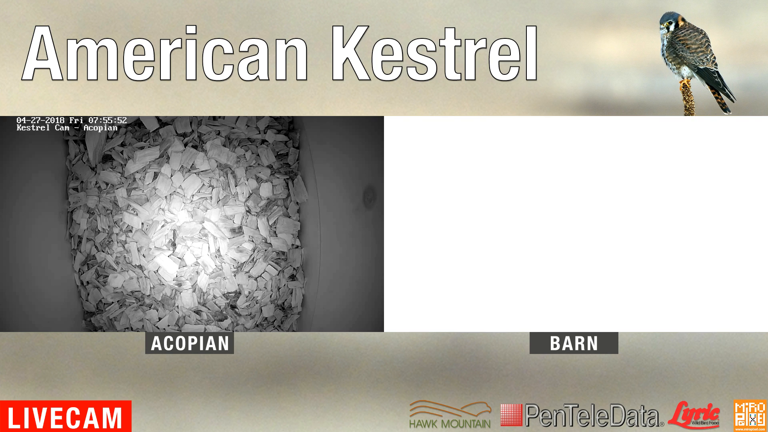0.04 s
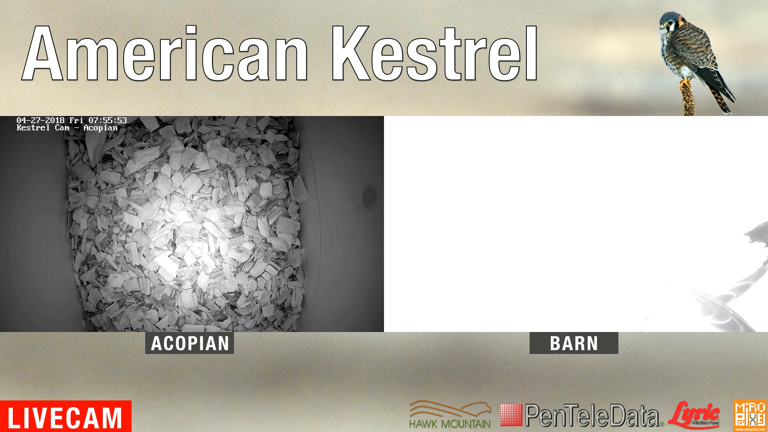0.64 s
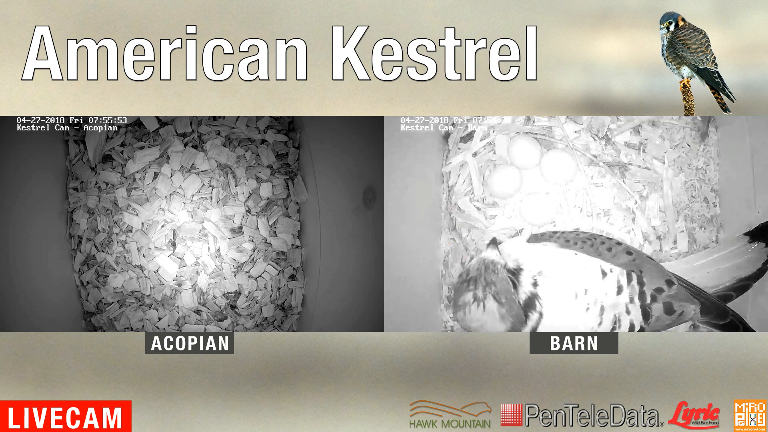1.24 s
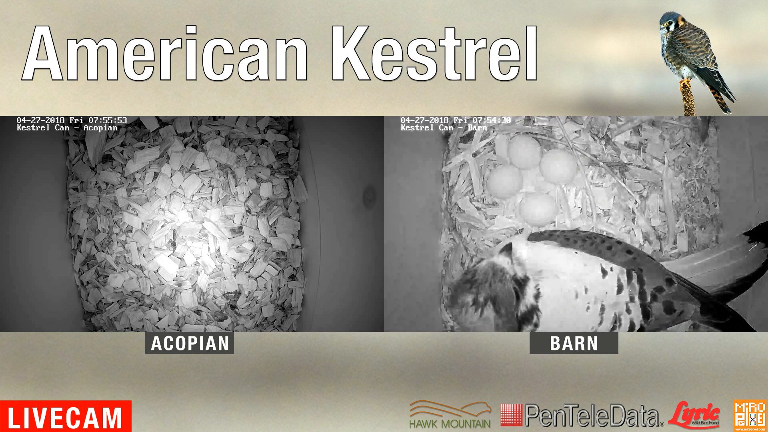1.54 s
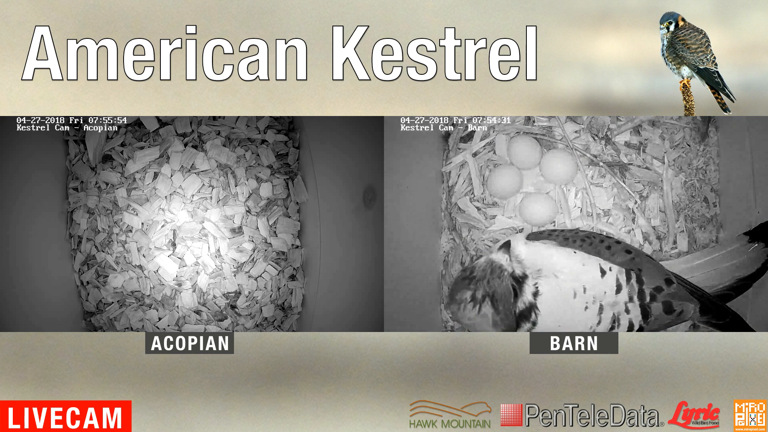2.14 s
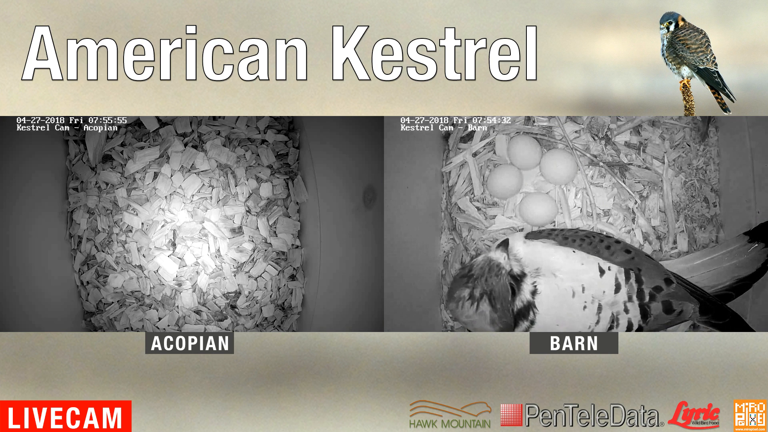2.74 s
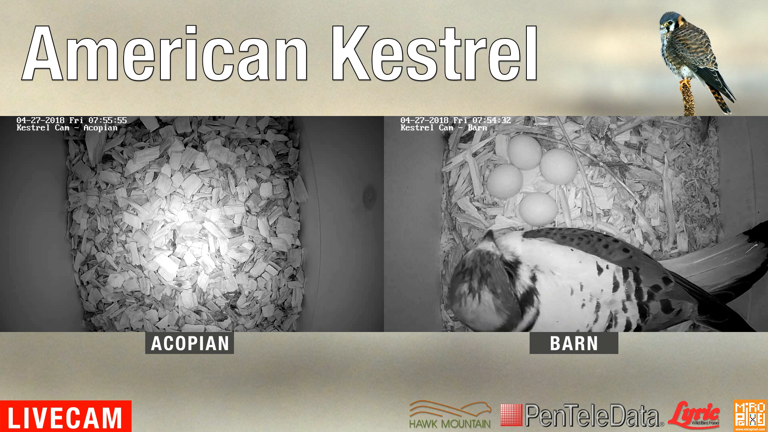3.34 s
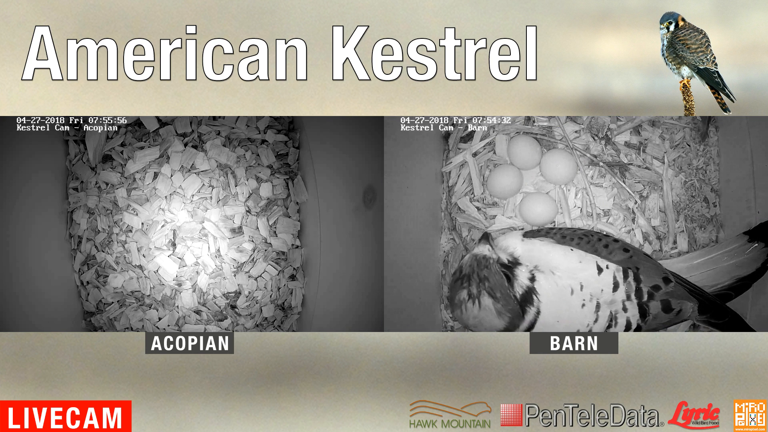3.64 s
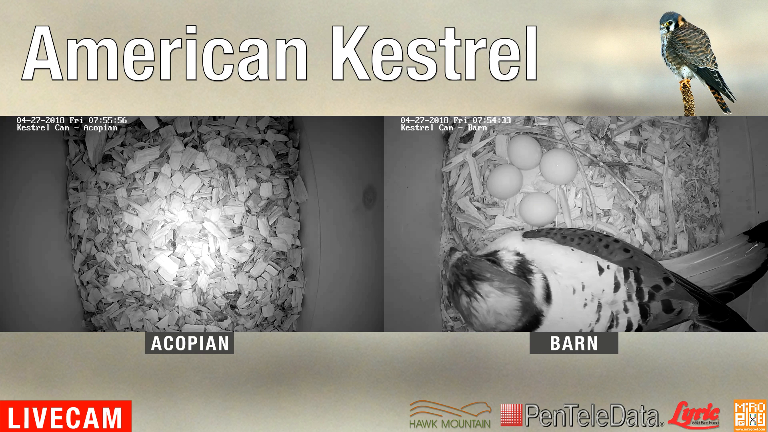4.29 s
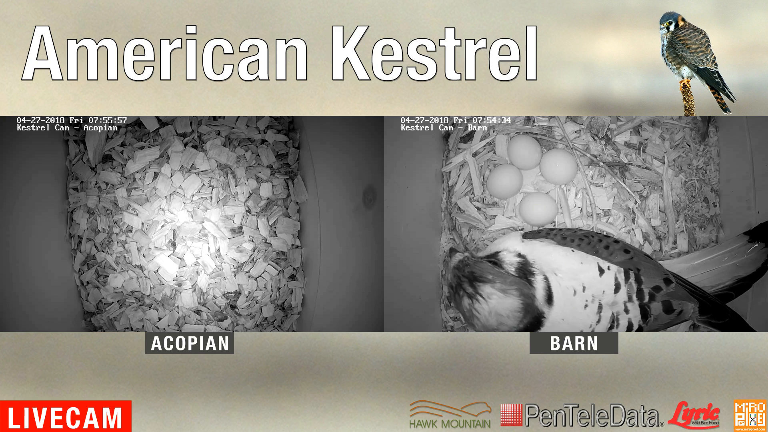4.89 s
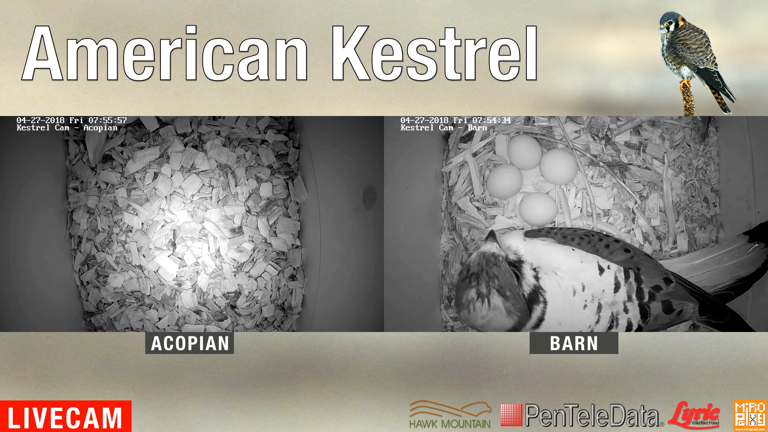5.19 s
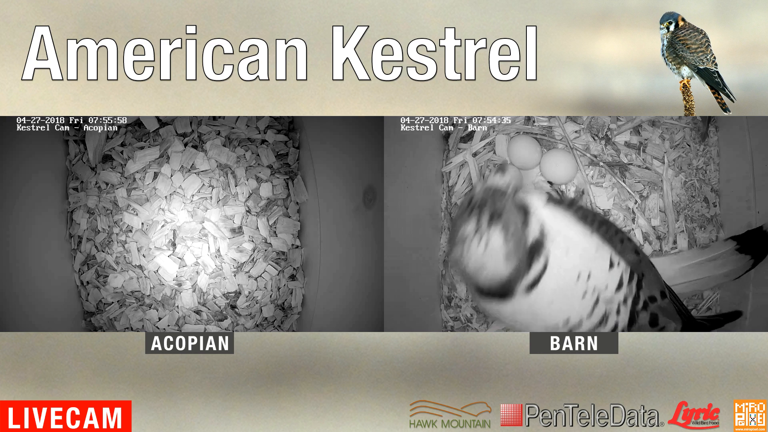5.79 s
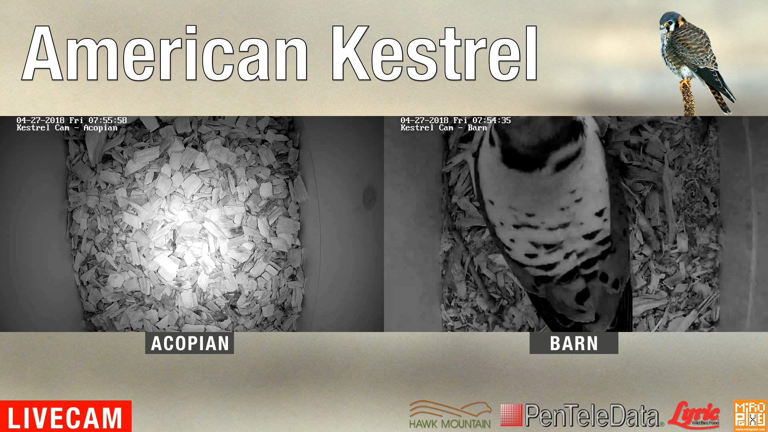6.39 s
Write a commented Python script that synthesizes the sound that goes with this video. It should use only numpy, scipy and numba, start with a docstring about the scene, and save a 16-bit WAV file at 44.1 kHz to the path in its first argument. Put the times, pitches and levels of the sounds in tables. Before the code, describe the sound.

A small falcon shuffles about on wood shavings inside a wooden nest box. Its body crunches the bedding while its feet scrape and knock and dry chips snap and creak. Two faint, thin high squeaks come midway, followed by one sharper knock, then hoarse falling swishes crowd in among the crackles. The microphone is very close and hisses steadily, and the box adds a short hollow ring.

```python
"""A small falcon shuffles about in a wooden nest box, close to the microphone of a nest camera.
From the start its body crunches the shavings, its feet scrape and knock, and dry chips snap and creak.
Two thin high squeaks come near 3.2 and 4 s, the hardest knock at 4.4 s; then hoarse falling swishes
crowd in. Throughout, the box adds a short hollow ring, the microphone hisses, and the camera's low
sample rate mirrors a faint fizz into the treble."""
import sys
import numpy as np
from scipy import signal
from scipy.fft import rfft, irfft, next_fast_len
from scipy.io import wavfile
from scipy.ndimage import uniform_filter1d, minimum_filter1d
from numba import njit

SR = 44100
rng = np.random.default_rng(int(sys.argv[2]) if len(sys.argv) > 2 else 0)


def log_audio(samples):
    """Write samples as a 16-bit WAV file to the path given in sys.argv[1]."""
    # one column per channel
    frames = np.atleast_2d(samples).T
    # limit to full scale, then quantise
    limited = np.clip(frames, -1, 1)
    pcm = np.round(limited * 32767).astype(np.int16)
    wavfile.write(sys.argv[1], SR, pcm)


N = 283122
T = np.arange(N) / SR

# Levels in all tables are relative: each layer has its own gain.
# blows of feet and bill: t/s, level/dB, f/Hz, ring swell/cycles, loose chips against the blow/dB
KNOCK_HITS = [(0.148, -19, 1360, 3, -5), (0.164, -24, 477, 1.8, -28), (0.247, -19, 1640, 5.5, -12),
              (0.276, -17.5, 2530, 4.3, -24), (0.304, -23, 1640, 2.2, -9), (0.322, -15.5, 950, 1.6, -26),
              (0.362, -16.5, 560, 1.5, -8.5), (0.406, -20.5, 377, 2.7, -19.5), (0.492, -19, 1390, 3.7, -22),
              (0.603, -21, 870, 3.7, -21), (0.615, -13, 1290, 1.4, -13), (0.665, -17, 1660, 3.5, -10),
              (0.683, -22.5, 2950, 3.5, -5), (0.7045, -11, 690, 0.76, -14), (0.717, -22, 2850, 4.6, -4),
              (0.793, -21.5, 820, 1.7, -19), (0.841, -25.5, 1080, 1.9, -0.5), (0.9225, -12, 2030, 3.6, -11),
              (0.932, -19, 2330, 3.1, -14), (1.001, -24, 2020, 3, -21), (1.067, -27, 660, 2.1, -20),
              (1.113, -24, 470, 1.5, -11), (1.238, -17.5, 1127, 4.3, -22), (1.249, -18.5, 1127, 4.6, -25),
              (1.261, -17, 424, 1.16, -17), (1.376, -20, 945, 2.8, -27), (1.466, -19, 1165, 2.1, -2.5),
              (1.524, -6.5, 1980, 3.1, -29), (1.5303, -7.5, 1095, 1.3, -15), (1.531, -17, 2460, 4.8, -19),
              (1.544, -10, 1510, 2.1, -23), (1.621, -20, 800, 2, -23), (1.716, -18.5, 1010, 4.7, -10),
              (1.741, -19, 860, 1.4, -9), (1.778, -17.5, 1660, 4.3, -15), (1.827, -23, 423, 1.3, -10),
              (1.881, -15, 1125, 1.8, -15), (2.092, -23, 1610, 3, -22), (2.108, -14, 1220, 4, -15),
              (2.299, -19, 1296, 2.8, -3.5), (2.554, -12.5, 1880, 0.98, -2), (2.593, -15.5, 2650, 2.2, -14),
              (2.667, -20.5, 2290, 3.7, -13), (2.736, -17, 1830, 3, -15), (2.823, -19, 2540, 4.4, -16),
              (2.829, -11.5, 2010, 2.6, -9), (2.833, -20, 350, 0.59, -19), (2.891, -23, 2410, 2.9, -8),
              (2.955, -19.5, 630, 1.5, -17.5), (2.968, -20.5, 1700, 4.8, -18),
              (3.003, -22.5, 580, 1.2, -27), (3.05, -20.5, 2170, 5.9, -19), (3.062, -17, 1470, 2.8, -10),
              (3.264, -10, 1765, 4, -4.5), (3.274, -11, 2050, 4.8, -14), (3.291, -16, 2400, 5.2, -13),
              (3.309, -15, 1450, 4.8, -10), (3.323, -8.5, 2614, 4.1, -16), (3.3245, -10, 1224, 0.71, -7),
              (3.34, -23.5, 455, 1.5, -12), (3.392, -13.5, 2380, 6, -5.5), (3.449, -24.5, 670, 1.1, -11),
              (3.57, -18.5, 1970, 2.6, -26), (3.622, -19, 2160, 2.2, -12), (3.672, -15.5, 1210, 3.2, -12),
              (3.793, -23, 1130, 2.2, -11), (3.893, -16, 2150, 4.5, -23), (3.934, -20, 3120, 7, 0.5),
              (3.966, -23, 780, 1.5, -19), (3.987, -21, 2180, 5, -24), (4.04, -23.5, 765, 2, -20),
              (4.056, -22.5, 360, 1.3, -33), (4.065, -22, 2140, 4, -16), (4.266, -20, 1247, 4.8, -20),
              (4.296, -14.5, 1950, 4, -34), (4.351, -12, 2420, 4.9, -26), (4.4136, -7, 1750, 2.9, -13),
              (4.4168, 1, 2106, 4, -25), (4.42, -15, 3550, 5.4, -1), (4.4265, -10, 1980, 3.5, -14),
              (4.683, -15.5, 2910, 3, -2.5), (4.863, -12.5, 548, 0.97, -19), (4.898, -21.5, 2600, 4.9, -6),
              (4.921, -19.5, 380, 1.8, -35), (4.937, -23, 834, 2.8, -1.5), (5.39, -16.5, 2650, 6.3, -15),
              (5.392, -16, 1107, 3.4, -38), (5.441, -20, 1950, 3.4, -25), (5.722, -14.5, 606, 1.5, -18),
              (5.766, -15.5, 618, 2.3, -26), (5.924, -23, 1930, 2.9, -2), (5.942, -22.5, 1870, 4.4, -5.5),
              (6.236, -12.5, 1945, 4.8, -11), (6.275, -26.5, 360, 1.05, -18), (6.394, -23, 1190, 1.7, -10),
              (6.404, -23.5, 2490, 4, -15)]
# dry chips breaking: t/s, level/dB, f/Hz, splinters against the tick/dB, splintering time/s
CHIP_SNAPS = [(0.275, -23.5, 5830, -2.5, .007), (0.708, -26, 6570, -4, .01),
              (0.747, -24.5, 5350, -7, 0.0079), (0.826, -22.5, 4500, -6.5, 0.013),
              (0.928, -38, 4600, 8, .01), (1.524, -29.5, 5700, 6, .016), (1.77, -27.5, 5760, 4, .008),
              (1.841, -41, 4030, 17.5, .016), (2.202, -31, 6500, 3, .007), (2.2312, -27, 6800, 8.5, 0.0094),
              (2.5545, -19.5, 5030, 8.5, 0.0099), (2.58, -31, 4960, 9, .016), (2.667, -25.5, 4400, -7, .01),
              (2.826, -28.5, 3940, -2, 0.0085), (3.05, -28, 5160, 0, 0.011),
              (3.0848, -25, 5400, -4, 0.0097), (3.2653, -18.5, 4300, 3.5, 0.0067),
              (3.292, -11.5, 6150, -2, 0.0035), (3.3018, -23, 6470, -1, 0.0027),
              (3.323, -23, 5600, 12, .004), (3.395, -38, 5230, 0, 0.0097), (3.611, -20, 4700, -7, 0.015),
              (3.786, -27, 6900, 1, 0.0074), (3.915, -21, 4250, 6, 0.015), (3.935, -16.5, 5900, -6, .011),
              (4.418, -25, 5960, -1, 0.012), (4.441, -19, 5800, -7, 0.009), (4.539, -24, 5300, 3, .012),
              (4.683, -23, 4300, 5, 0.017), (4.826, -31.5, 4570, 6.5, .012), (4.846, -24, 5200, -11, 0.014),
              (4.898, -31, 5040, 4, 0.008), (5.074, -26, 4770, 1.5, 0.012), (5.3867, -22.5, 4500, 4.5, .01),
              (5.746, -29.5, 3670, 10, 0.039), (5.9728, -27, 4830, 10, 0.013),
              (6.014, -17.5, 4560, -2, .018), (6.2373, -22.5, 4600, 5, 0.027),
              (6.396, -23, 5260, 5, 0.0063)]


def knocks():
    """Feet and bill strike the bedding and the boards beneath; cushioned blows ring for fewer cycles."""
    start, db, hz, cycles, chips_db = np.transpose(KNOCK_HITS)
    hits = blows(start, db, hz, chips_db, cycles, settle_s=.045, octaves=.486, chip_cycles=2.04, count=44)
    return undb(-2.5) * band(hits, low_hz=242, high_hz=3550, order=2)


def bedding(weight, hz):
    """The packed shavings give way under the bird in dull crunches."""
    crunch = rustle(hz, octaves=.92, cycles=1.18, scatter_db=-.5, slide_s=.03, count=1100, slips=7)
    return level(band(crunch, low_hz=314, high_hz=1130, order=4), -3.5) * weight


def scraping(drag, hz):
    """Chips slip over each other; their pitch moves with the stroke."""
    scrape = rustle(hz, octaves=.69, cycles=1.24, scatter_db=3, slide_s=.024, count=1400, slips=16)
    return level(band(scrape, low_hz=750, high_hz=2440), -1.36) * drag


def snaps():
    """Thin chips crack with a bright tick or tear in a grainy scratch."""
    start, db, hz, chips_db, tear_s = np.transpose(CHIP_SNAPS)
    return undb(-3) * blows(start, db, hz, chips_db, cycles=3.5, settle_s=tear_s[:, None],
                            octaves=.21, chip_cycles=.74, count=56)


def rasps():
    """A claw dragged hard makes the wood sing a rough, sagging note."""
    # claw strokes: t/s, length/s, level/dB, starting f/Hz
    claw_strokes = [(0.594, 0.016, -16.5, 1987), (0.926, 0.083, -25, 2060), (1.332, 0.0063, -19.5, 2324),
                    (2.25, 0.06, -20, 1456), (3.562, 0.0094, -21, 1780), (4.3, 0.049, -22, 2022),
                    (5.1, 0.023, -23.5, 2070), (5.73, 0.09, -28.5, 1887), (5.99, 0.064, -21.5, 1800),
                    (6.055, 0.15, -25.5, 1970), (6.236, 0.056, -24.5, 1962)]
    return undb(-6) * glides(claw_strokes, width_hz=410, octaves_per_s=-.41,
                             attack_s=.019, sag_db_per_s=23, release_s=.016)


def swishes():
    """Hoarse bands of noise slide downwards, coloured by two resonances."""
    # swishes: t/s, length/s, level/dB, starting f/Hz
    sweeps = [(0.37, 0.078, -29.5, 3910), (0.92, 0.013, -26, 4560), (1.693, 0.17, -30, 3910),
              (1.85, 0.027, -32.5, 3390), (2.385, 0.056, -25, 3665), (2.47, 0.029, -30.5, 4800),
              (3.79, 0.15, -34, 3950), (4.49, 0.11, -25, 3640), (5.082, 0.075, -20.5, 4280),
              (5.21, 0.066, -28.5, 3990), (5.39, 0.059, -28, 4570), (5.475, 0.024, -24, 4400),
              (5.52, 0.029, -26, 4160), (5.755, 0.033, -33, 3890), (5.92, 0.033, -22.5, 5150),
              (5.99, 0.055, -32, 3710)]
    # their resonances: f/Hz, width/Hz, level against the direct sound/dB
    modes = [(3480, 200, -2), (4400, 98, -6)]
    noise = glides(sweeps, width_hz=1180, octaves_per_s=-1.4,
                   attack_s=.016, sag_db_per_s=72, release_s=.063, order=3)
    return undb(-5.5) * resonate(noise, modes)


def whistles():
    """Now and then a swish narrows into a breathy note."""
    # breathy notes: t/s, length/s, level/dB, starting f/Hz
    notes = [(0.375, 0.04, -34, 4020), (0.987, 0.019, -26, 3516), (1.035, 0.018, -34, 3540),
             (1.413, 0.0071, -33, 3600), (1.695, 0.03, -30, 3430), (1.765, 0.0098, -28, 3470),
             (2.39, 0.046, -29, 3430), (3.173, 0.013, -32, 3500), (4.5, 0.066, -27.5, 3460),
             (5.09, 0.019, -24.5, 4600), (5.13, 0.063, -34.5, 3510), (5.392, 0.054, -31, 4630),
             (5.478, 0.033, -30, 4530), (5.515, 0.04, -30, 3510), (5.945, 0.025, -33, 4530),
             (5.995, 0.02, -28, 3460), (6.04, 0.016, -33, 3500)]
    return undb(-3) * glides(notes, width_hz=350, octaves_per_s=-.014,
                             attack_s=.0054, sag_db_per_s=30, release_s=.013)


def creaks():
    """A chip squeezed against its neighbour underfoot squeaks upwards."""
    # creaking chips: t/s, length/s, level/dB, starting f/Hz
    notes = [(0.606, 0.057, -23.5, 816), (1.335, 0.015, -22, 923), (1.428, 0.01, -21.5, 800),
             (3.66, 0.021, -19.5, 1124), (3.795, 0.035, -29, 1096), (4.085, 0.024, -26.5, 1220)]
    return undb(-7.5) * glides(notes, width_hz=120, octaves_per_s=3.3,
                               attack_s=.0043, sag_db_per_s=15, release_s=.006)


def squeaks():
    """Thin wavering tones at the very top, barely rising."""
    # high squeaks: t/s, length/s, level/dB, starting f/Hz
    notes = [(3.19, 0.04, -44, 7500), (3.99, 0.094, -45, 7080)]
    return undb(5.5) * glides(notes, width_hz=420, octaves_per_s=.12,
                              attack_s=.032, sag_db_per_s=20, release_s=.025)


def feathers(drag, stir):
    """Barbs tick over the shavings so densely that they merge into a soft hiss."""
    barbs = rustle(centre_hz=3410, octaves=.63, cycles=.87, scatter_db=3,
                   slide_s=.022, count=6500, slips=14)
    strength = np.sqrt(undb(-43) ** 2 + (undb(-14) * drag) ** 2 + (undb(-15) * stir) ** 2)
    return level(band(barbs, low_hz=2050, high_hz=5630), -1.34) * strength


def splinters(drag, stir):
    """The finest slivers crackle on top."""
    crackle = rustle(centre_hz=5696, octaves=.25, cycles=3.5, scatter_db=4.5,
                     slide_s=.0071, count=4000, slips=8)
    strength = np.sqrt(undb(-62.5) ** 2 + (undb(-23) * drag) ** 2 + (undb(-20) * stir) ** 2)
    return level(band(crackle, low_hz=4740, high_hz=7050), -.16) * strength


def boards(strength):
    """The floor of the box passes on a faint, lumpy rumble."""
    body = band(rng.standard_normal(N), low_hz=200, high_hz=303, order=1)
    rumble = band(body, low_hz=45, high_hz=350, order=2)
    return level(rumble, -1.5) * strength * uneven(depth_db=3.5, step_s=.03)


def box(x, t60_s, echo_db, change_s):
    """Close walls add a hollow ring and a short dense echo that shifts as the bird touches new spots."""
    # resonances of box and camera housing: f/Hz, width/Hz, level against the direct sound/dB
    modes = [(150, 22, -8), (255, 94, 2.5), (360, 65, -13), (534, 100, -9), (809, 60, -0.5),
             (1254, 200, -13.5), (2070, 300, -9), (2777, 600, -1.5), (6880, 240, -7.5)]
    t = T[:SR // 8]
    decay = np.exp(-np.log(1000) * t / t60_s) * (t > .0015)
    hop = int(change_s * SR)
    out = x.copy()
    for first in range(-hop, N, hop):
        at = np.arange(max(first, 0), min(first + 2 * hop, N))
        crossfade = np.sin(np.pi * (at - first) / (2 * hop))
        echo = rng.standard_normal(len(t)) * decay
        wet = signal.fftconvolve(x[at] * crossfade, echo / np.linalg.norm(echo))[:N - at[0]]
        out[at[0]:at[0] + len(wet)] += undb(echo_db) * wet
    return resonate(out, modes)


def hiss():
    """A steady bed of microphone noise."""
    # noise colour: f/Hz, level/dB
    spectrum = [(25, -19), (70, -70), (140, -18), (280, -9.5), (1000, -1), (2000, 1.5), (4000, -30),
                (7400, -28.5)]
    hz, db = np.transpose(spectrum)
    noise = shape(rng.standard_normal(N), lambda f: undb(np.interp(np.log(f), np.log(hz), db)))
    return level(noise, -38.5)


def blows(start, db, hz, chips_db, cycles, settle_s, octaves, chip_cycles, count):
    """Each blow rings briefly and shakes loose a shower of chips that thins out and dies."""
    delay, pitch, strength = rng.random((len(start), 3, count)).transpose(1, 0, 2)
    age = ((np.arange(count) + delay) / count) ** 1.4
    chip_hz = hz[:, None] * 2 ** (octaves * (2 * pitch - 1))
    chip_size = undb((db + chips_db)[:, None] - 7.3 * age) * (2 * strength - 1)
    chip_start = start[:, None] + settle_s * age
    shower = grains(chip_start.ravel(), chip_hz.ravel(), chip_cycles / chip_hz.ravel(), chip_size.ravel())
    return grains(start, hz, cycles / hz, undb(db)) + shower


def rustle(centre_hz, octaves, cycles, scatter_db, slide_s, count, slips):
    """`count` chips slide in turn, each in tiny slips around a pitch and strength of its own."""
    place, pitch, strength = rng.random((3, count, 1))
    delay, detune, slip = rng.random((3, count, slips))
    chip_s = (np.arange(count)[:, None] + place) / count * N / SR
    start = chip_s + slide_s * (delay - .5)
    spread = 2 * pitch - 1 + .34 * (detune - .5)
    hz = np.interp(start, T, centre_hz + 0 * T) * 2 ** (octaves * spread)
    force = undb(-scatter_db * np.log(strength + .02)) * (2 * slip - 1)
    return grains(start.ravel(), hz.ravel(), cycles / hz.ravel(), (force * np.sqrt(hz)).ravel())


@njit
def grains(start, hz, swell_s, size):
    """Short damped rings: each peaks `swell_s` after its start and dies away."""
    out = np.zeros(N)
    for k in range(len(start)):
        first, rise = int(start[k] * SR), swell_s[k] * SR
        ring = size[k] * np.e + 0j
        step = np.exp(2j * np.pi * hz[k] / SR - 1 / rise)
        for i in range(int(9 * rise)):
            if 0 <= first + i < N:
                out[first + i] += ring.imag * i / rise
            ring *= step
    return out


def glides(table, width_hz, octaves_per_s, attack_s, sag_db_per_s, release_s, order=2):
    """Narrow noisy tones, one to a stroke, whose pitch slides while the stroke lasts."""
    out = np.zeros(N)
    smooth = signal.butter(order, width_hz / 2, fs=SR, output="sos")
    for start, length_s, db, start_hz in table:
        now = (T > start - .1) & (T < start + .3)
        hz = start_hz * 2 ** (octaves_per_s * np.clip(T[now] - start, 0, length_s))
        noise = rng.standard_normal((2, SR // 2))
        waver = signal.sosfilt(smooth, noise[0] + 1j * noise[1])[-len(hz):]
        carrier = np.exp(2j * np.pi * np.cumsum(hz) / SR)
        tone = level(np.real(waver * carrier), db)
        out[now] += tone * stroke(start, length_s, attack_s, sag_db_per_s, release_s)[now]
    return out


def stroke(start, length_s, attack_s, sag_db_per_s, release_s):
    """Envelope of one movement: it swells around its start, weakens while it lasts and dies away."""
    age = np.maximum(T - start, 0)
    swell = .5 + .5 * np.tanh((T - start) / attack_s)
    release = np.exp(-np.maximum(age - length_s, 0) / release_s)
    return swell * undb(-sag_db_per_s * age) * release


def strokes(table, rest_db, rest_hz, attack_s, sag_db_per_s, release_s):
    """Strength and pitch of a run of movements over a resting level; the strongest leads the pitch."""
    power = undb(rest_db) ** 2 + 0 * T
    weighted_hz = power * rest_hz
    for start, length_s, db, hz in table:
        share = (undb(db) * stroke(start, length_s, attack_s, sag_db_per_s, release_s)) ** 2
        power += share
        weighted_hz += share * hz
    return np.sqrt(power), weighted_hz / power


def stirred(hits, build_s, settle_s):
    """Shavings bend just before a blow or snap and set their neighbours moving; they settle again."""
    return np.sqrt(sum((undb(db) * stroke(s, 0, build_s, 0, settle_s)) ** 2 for s, db, *_ in hits))


def uneven(depth_db, step_s):
    """Shavings catch and let go: a gain that wanders at random."""
    steps = np.clip(rng.standard_normal(2000), -2, 2)
    return undb(depth_db * np.interp(T / step_s, np.arange(len(steps)), steps))


def resonate(x, modes):
    """Add resonances to the direct sound."""
    return shape(x, lambda f: 1 + sum(undb(db) / (1 + 1j * (f / hz - hz / f) * hz / width)
                                      for hz, width, db in modes))


def shape(x, gain):
    """Equalise with a gain that is a function of frequency."""
    size = next_fast_len(len(x) + 4096)
    hz = np.fft.rfftfreq(size, 1 / SR) + 1
    return irfft(rfft(x, size) * gain(hz), size)[:len(x)]


def band(x, low_hz, high_hz, order=3):
    """Band-pass."""
    sos = signal.butter(order, [low_hz, high_hz], "bandpass", fs=SR, output="sos")
    return signal.sosfilt(sos, x + 1e-18)


def limit(x, samples):
    """Duck smoothly around peaks that would pass full scale."""
    gain = 1 / np.maximum(np.abs(x), 1)
    return x * uniform_filter1d(minimum_filter1d(gain, 2 * samples), samples)


def level(x, db):
    """Set the rms level."""
    return x * undb(db) / np.sqrt(np.mean(x ** 2))


def undb(db):
    """Decibels to gain."""
    return 10 ** (np.asarray(db) / 20)


def scene():
    """All of the bird's movements, heard inside the box over the microphone's hiss."""
    # the bird's weight sinks into the bedding: t/s, length/s, level/dB, centre f/Hz
    crunches = [(0.3, 0.046, -28, 930), (0.36, 0.077, -24.5, 560), (0.48, 0.067, -24.5, 660),
                (0.6, 0.066, -24, 850), (0.716, 0.033, -19, 634), (0.82, 0.038, -24.5, 746),
                (0.94, 0.11, -30.5, 630), (1.234, 0.046, -21.5, 558), (1.525, 0.0083, -21.5, 774),
                (1.59, 0.032, -23, 785), (1.81, 0.12, -27.5, 620), (2.07, 0.12, -27, 624),
                (2.26, 0.023, -27, 900), (2.51, 0.069, -34, 540), (2.7, 0.036, -28, 606),
                (2.825, 0.025, -33.5, 385), (2.95, 0.11, -33.5, 493), (3.05, 0.038, -30, 745),
                (3.275, 0.058, -25.5, 810), (3.33, 0.064, -24.5, 730), (3.55, 0.05, -33, 680),
                (3.625, 0.02, -31, 394), (3.946, 0.02, -19.5, 556), (4.04, 0.014, -36, 490),
                (4.16, 0.061, -33.5, 650), (4.42, 0.064, -34, 760), (4.55, 0.027, -30, 340),
                (4.67, 0.022, -34, 890), (4.876, 0.041, -22, 580), (5.11, 0.084, -30.5, 630),
                (5.215, 0.02, -26.5, 385), (5.39, 0.02, -29, 517), (5.61, 0.015, -30, 450),
                (5.725, 0.098, -28.5, 595), (5.81, 0.04, -32, 546)]
    # a foot drags through the shavings: t/s, length/s, level/dB, centre f/Hz
    scrapes = [(0.0, 0.0035, -24, 1550), (0.12, 0.017, -38, 1520), (0.255, 0.14, -25, 1450),
               (0.48, 0.019, -26.5, 1290), (0.6, 0.1, -28, 1500), (0.712, 0.037, -26, 1380),
               (0.93, 0.087, -31, 1960), (1.243, 0.062, -26, 1140), (1.46, 0.012, -40, 1190),
               (1.525, 0.13, -27.5, 1490), (1.7, 0.048, -26, 1300), (1.8, 0.13, -26.5, 1890),
               (2.085, 0.011, -23.5, 1260), (2.24, 0.1, -24, 1390), (2.39, 0.051, -23.5, 2020),
               (2.55, 0.12, -29.5, 1910), (2.69, 0.15, -34, 1810), (2.97, 0.24, -33.5, 1460),
               (3.17, 0.11, -32, 1850), (3.285, 0.049, -19.5, 1790), (3.39, 0.072, -28.5, 2140),
               (3.55, 0.093, -31, 1810), (3.78, 0.14, -33.5, 1250), (3.87, 0.17, -30, 2190),
               (4.03, 0.054, -27.5, 1940), (4.24, 0.03, -27.5, 1820), (4.3, 0.023, -24, 1830),
               (4.425, 0.026, -17.5, 1800), (4.665, 0.02, -29.5, 1780), (4.82, 0.087, -27, 2450),
               (4.95, 0.026, -29.5, 1170), (5.08, 0.089, -29.5, 2060), (5.39, 0.028, -26, 1920),
               (5.62, 0.013, -31, 1600), (5.72, 0.14, -34, 1740), (5.94, 0.12, -30.5, 2130),
               (6.235, 0.035, -42, 1970), (6.39, 0.018, -27.5, 1660)]
    # light fidgeting between strokes: t/s, bedding level/dB, floor board level/dB
    fidget = [(0.0, -30, -59), (0.19, -37, -56), (0.3, -41, -44), (1.0, -32, -47.5), (1.18, -36, -46),
              (1.4, -32, -49), (1.9, -41, -46.5), (2.62, -41.5, -66.5), (3.05, -39, -45.5),
              (3.6, -43.5, -65), (4.1, -38.5, -49), (4.3, -44, -58), (5.05, -34.5, -55.5), (5.3, -47, -62),
              (5.55, -44, -59), (6.05, -33.5, -48.5), (6.42, -40.5, -54.5)]
    times, *levels = np.transpose(fidget)
    bedding_db, boards_db = [np.interp(T, times, db) for db in levels]
    weight, crunch_hz = strokes(crunches, rest_db=bedding_db, rest_hz=581,
                                attack_s=.0093, sag_db_per_s=44, release_s=.043)
    drag, scrape_hz = strokes(scrapes, rest_db=-38, rest_hz=1688,
                              attack_s=.02, sag_db_per_s=23, release_s=.047)
    stir = stirred(CHIP_SNAPS, build_s=.03, settle_s=.077)
    pressed = undb(-13.5) * stirred(KNOCK_HITS, build_s=.0045, settle_s=.0083)
    shuffle = bedding(weight, crunch_hz) + scraping(np.hypot(drag, pressed), scrape_hz)
    shuffle += feathers(drag, stir) + splinters(drag, stir)
    rumble = boards(np.hypot(undb(boards_db), undb(-23) * weight))
    bird = shuffle + knocks() + snaps() + rasps() + creaks() + swishes() + whistles() + squeaks() + rumble
    return (undb(-1.69) * box(bird, t60_s=.077, echo_db=-9, change_s=.07) + hiss())[None]


def record(dry):
    """The camera keeps a narrow band, mirrors it upwards by coarse interpolation, limits and clips."""
    camera_rate_hz, band_hz, top_hz = 16000, 7530, 14000
    narrow = signal.sosfilt(signal.ellip(10, .3, 60, band_hz, fs=SR, output="sos"), dry[0])
    images = narrow * 2 * np.cos(2 * np.pi * camera_rate_hz * T)
    # images of low notes lie furthest out and are weakest
    fizz = shape(images, lambda f: np.clip(np.abs(camera_rate_hz - f) / f, 0, 1) ** 2.67)
    clipped = np.clip(limit(narrow + fizz, samples=60), -.94, .94)
    return signal.sosfilt(signal.ellip(8, .2, 70, top_hz, fs=SR, output="sos"), clipped)[None]


dry = scene()
out = record(dry)
log_audio(out)
```